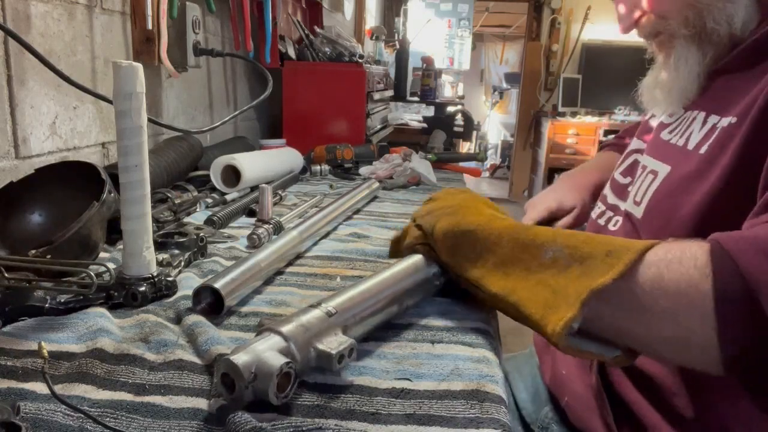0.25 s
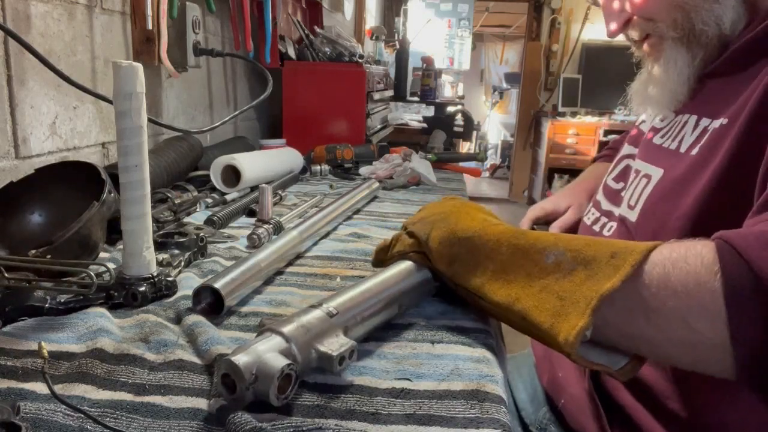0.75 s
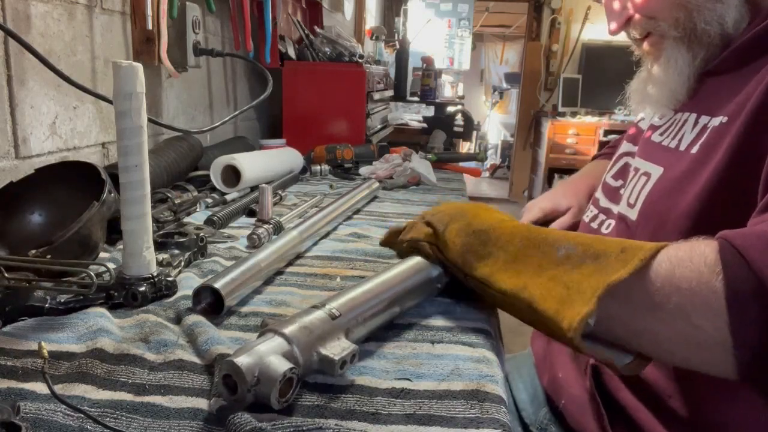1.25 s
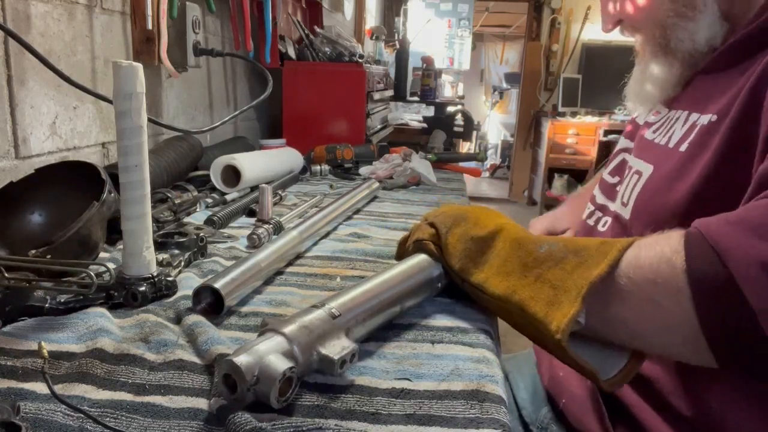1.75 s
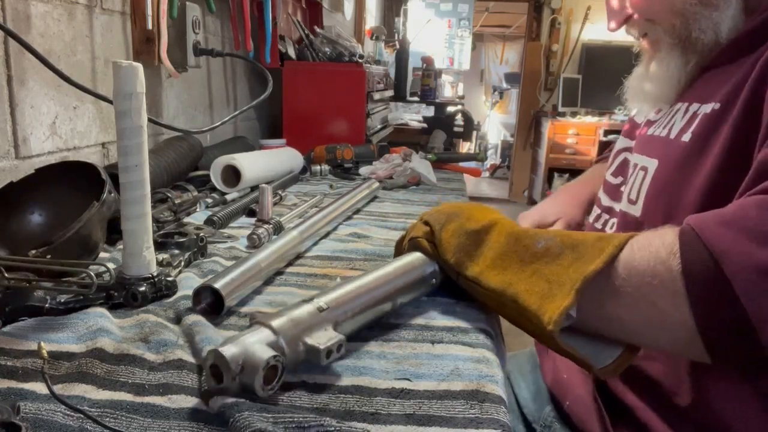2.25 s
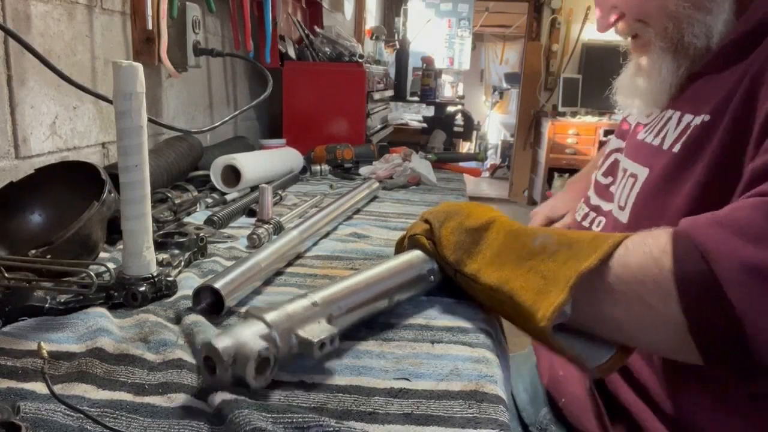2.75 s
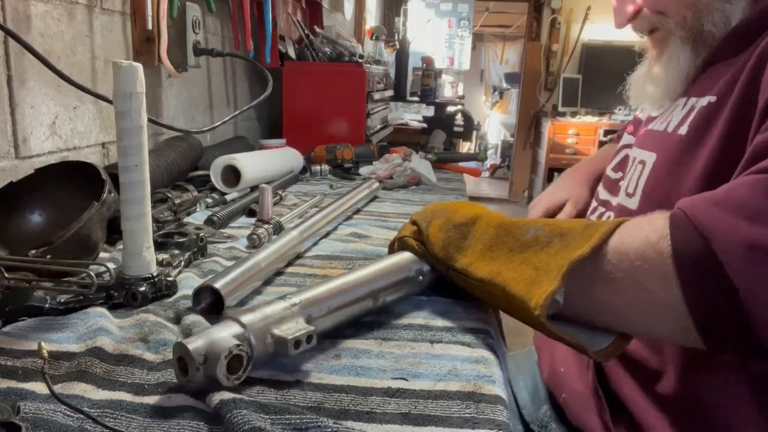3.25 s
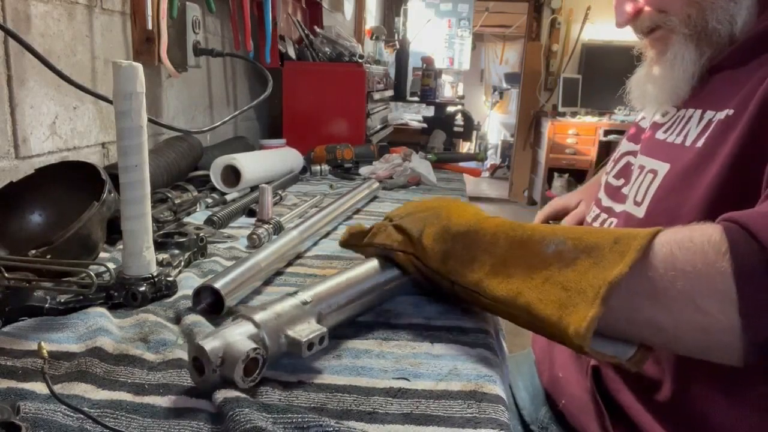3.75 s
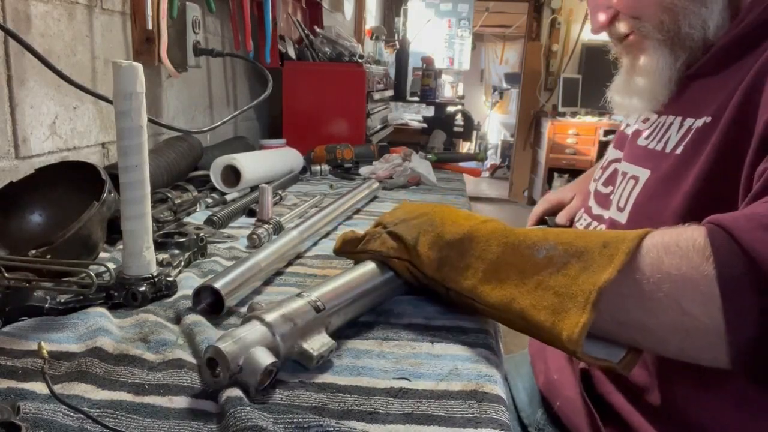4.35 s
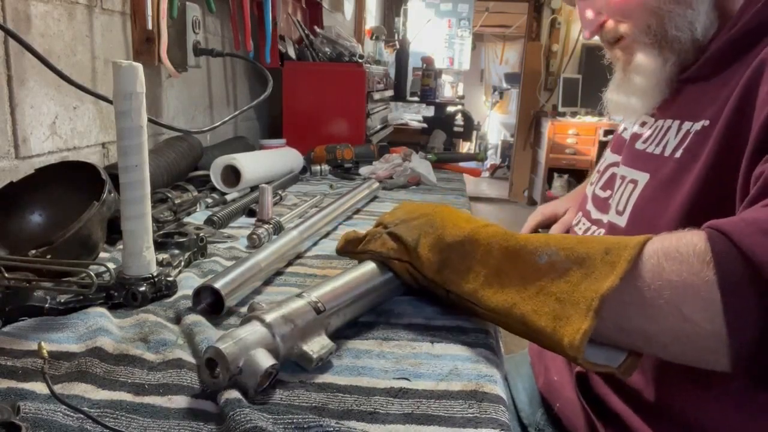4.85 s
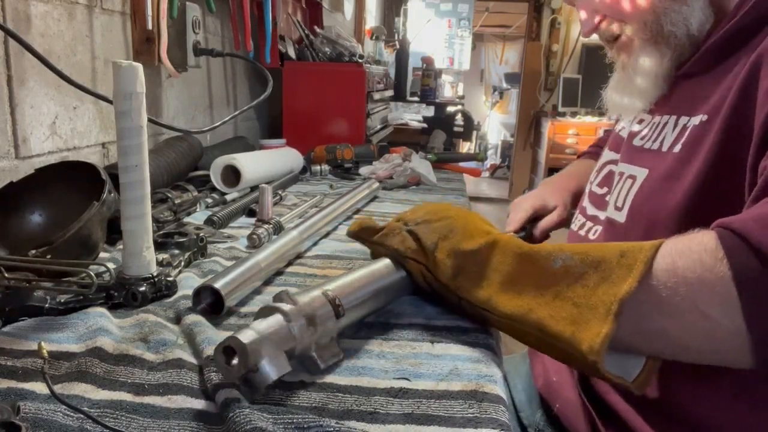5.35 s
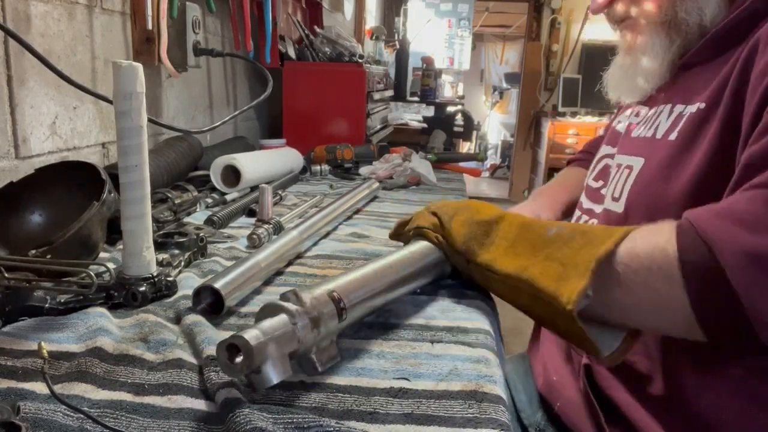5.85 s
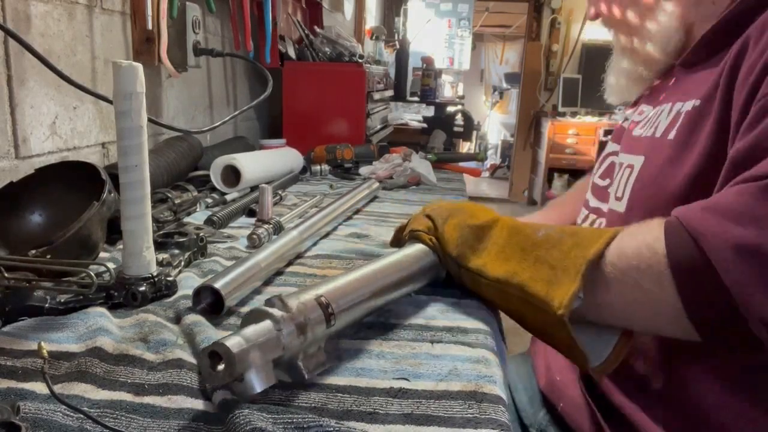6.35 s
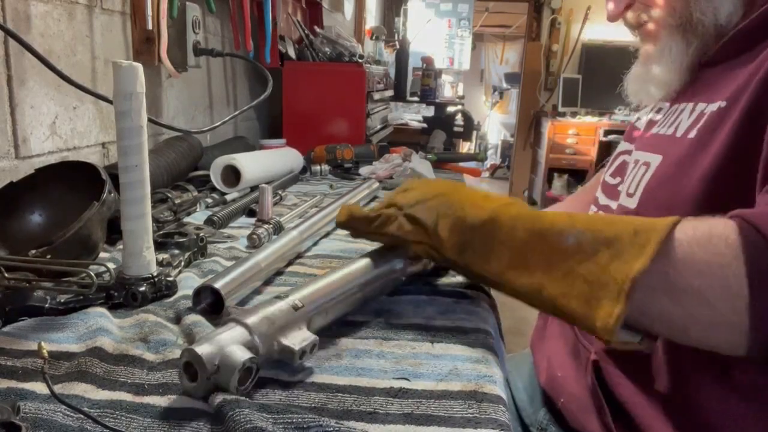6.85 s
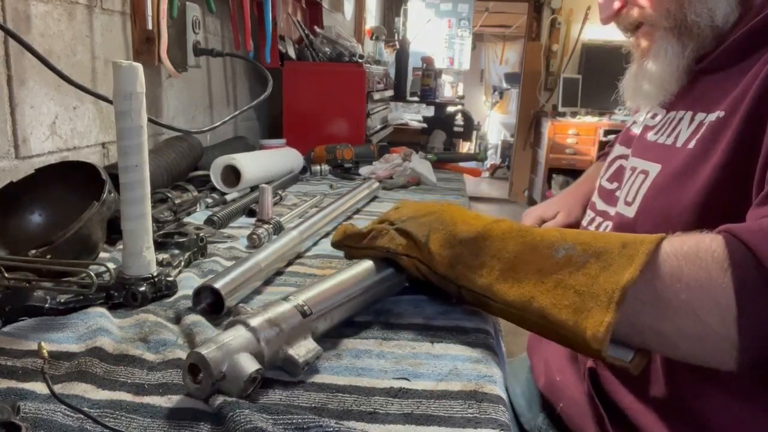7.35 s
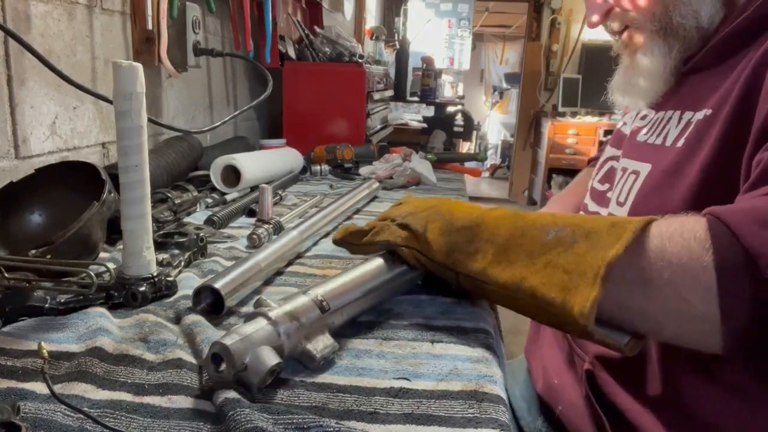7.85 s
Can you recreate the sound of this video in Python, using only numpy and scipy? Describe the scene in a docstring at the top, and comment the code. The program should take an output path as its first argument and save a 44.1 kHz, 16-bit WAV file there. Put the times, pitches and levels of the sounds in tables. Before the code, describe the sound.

Steel slides harshly inside a steel tube resting on a towel-covered bench. After a few clinks and bumps come five brisk back-and-forth rasps, bright and shimmering, the air inside rising in pitch on each push. A quiet stretch of small clicks leads to another single pump, then light catches, rubbing and rattling knocks. Close and dry-ish, with short room echoes and a steady low rumble.

```python
"""Slide-hammer strokes in a steel tube

A steel rod is pumped like a slide hammer inside a motorcycle fork tube on a towel-covered garage bench.
Friction slips drive resonances of steel, tube wall and enclosed air; stick-slip hoots; the steel shimmers on.
Knocks, catches and clinks of metal ring struck modes and resonances, and padded bumps ring the bench.
Two closely spaced microphone ports hear this with room echoes, over a low rumble with a trace of hiss."""
import sys
import numpy as np
from scipy import signal
from scipy.fft import rfft, irfft, next_fast_len
from scipy.io import wavfile

SR = 44100
rng = np.random.default_rng(int(sys.argv[2]) if len(sys.argv) > 2 else 0)


def digitize_waveform(pressure):
    """Quantize a signal to 16-bit integers and store it at the path in sys.argv[1].

    Rows of a 2-D input are taken as channels; values are limited to [-1, 1].
    """
    field = np.atleast_2d(pressure).T
    bounded = np.clip(field, -1, 1)
    quanta = np.round(bounded * 32767).astype(np.int16)
    wavfile.write(sys.argv[1], SR, quanta)


N = 356769
TIME = np.arange(N) / SR

# Pumps, a slow pull and a quick push: (pull start [s], push start [s], push end [s], end thump level [dB],
# then for the push: rasp [dB], hollow [dB], tube ring [dB])
PUMPS = [(1.511, 1.675, 1.782, -26, -15.5, -16, -19.5), (1.863, 1.994, 2.109, -30, -19.5, -21.5, -27.5),
         (2.168, 2.301, 2.398, -30.5, -15.5, -26, -31), (2.47, 2.637, 2.758, -36, -15, -22.5, -29.5),
         (2.832, 2.977, 3.072, -35.5, -13.5, -21, -28), (6.038, 6.265, 6.396, -35.5, -15.5, -17, -27.5)]
# Single slides of the rod, and one long faint slide of the weight along it:
# (start [s], length [s], rasp [dB], hollow [dB], tube ring [dB])
SLIDES = [(-.12, 0.24, -32, -48, -61.5), (1.356, 0.093, -28.5, -27.5, -28), (3.17, 0.25, -36.5, -60.5, -54),
          (5.043, 0.94, -69.5, -61, -72), (5.917, 0.1, -60, -43.5, -41)]
# Growth with mean stroke speed: (rasp exponent [1], hollow exponent [1], tube ring exponent [1])
SPEED_POWERS = (2.1, 1.2, 9.1)
PULL_PEAK_SHARE, PUSH_PEAK_SHARE = 0.4, 0.44   # fraction of the stroke's time at which the rod is fastest
PULL_SWELL = 0.77   # a pull is steadier: its friction follows speed to this power
REST_S, BREAKAWAY_DB = 1, -25   # tube ring level of a pull after this long without a pump
# Pitch of the air column with the rod drawn out, pushed home and in between
DRAWN_HZ, HOME_HZ, HALFWAY_HZ = 337, 790, 490
# Just before each push ends the rod bites and clacks on the bore, then drives the tube against the bench
STOP_CATCH_LEAD_S, STOP_CATCH_DB, STOP_CATCH_T60_S = 0.032, -11.5, 0.2
STOP_CLACK_DB, STOP_CLACK_T60_S = -41, 0.04
STOP_THUMP_LEAD_S, STOP_DEEP_DB, STOP_UPPER_DB = 0.011, -4, 5.5

# Resonances of the steel under the rasp: (frequency [Hz], width [Hz], level [dB])
STEEL = [(2226, 140, -10), (2875, 320, -1.5), (3400, 800, -1), (4045, 340, -0.5), (3820, 950, -7),
         (5310, 570, -6.5), (5975, 320, -7.5), (7296, 210, 4), (8900, 250, -0.5), (9990, 750, -7),
         (11490, 380, -8.5), (12400, 88, -4.5), (13900, 150, -6.5), (15280, 370, -15.5)]
# Narrow resonances picked out by the scraping contact: (frequency [Hz], width [Hz], level [dB])
CONTACT = [(3145, 90, -1), (4440, 170, -10.5), (5020, 82, -7), (6117, 100, -5), (7320, 39, 4)]
# Resonances of the air in the tube: (frequency [Hz], width [Hz], level [dB])
HOLLOW = [(273, 260, -1.5), (369, 48, 4), (476, 9.7, -3), (664, 72, 2), (730, 44, 1.5), (863, 38, -3),
          (1021, 96, 1.5), (1285, 250, -5.5), (1940, 210, -11.5)]
# Lower and upper resonance of the tube wall: (frequency [Hz], width [Hz], level [dB])
WALL = [(1605, 17, -3.5), (1755, 26, -6.5)]
# Stick-slip tones: (start [s], length [s], first pitch [Hz], last pitch [Hz], level [dB])
HOOTS = [(1.684, 0.036, 310, 593, -13), (1.882, 0.032, 816, 854, -10.5), (1.934, 0.049, 421, 353, -15.5),
         (2.068, 0.071, 687, 715, -22), (2.485, 0.015, 477, 730, -30.5), (2.585, 0.053, 407, 333, -21),
         (2.638, 0.053, 392, 476, -19), (2.71, 0.04, 580, 760, -18), (2.985, 0.029, 397, 680, -20.5),
         (3.016, 0.02, 480, 480, -20), (3.167, 0.038, 372, 312, -33.5), (6.104, 0.096, 376, 406, -20),
         (6.36, 0.025, 678, 782, -13.5)]

# Metal meets metal: (time [s], level [dB], ring pitch [Hz], ring t60 [s], clack re ring [dB],
# spray of slips re ring [dB])
KNOCKS = [(0.176, -34.5, 1760, 0.098, -16, 22.5), (0.754, -61, 1770, .05, 2, -14),
          (0.901, -55, 1704, 0.04, -1.5, -15), (1.1122, -26.5, 1764, 0.053, -9, 4),
          (1.294, -39, 1605, 0.039, -14, -31), (1.3806, -25, 1678, 0.1, -22, -3),
          (4.9161, -28.5, 1706, 0.027, -7.5, 14.5), (5.086, -56.5, 1634, 0.028, -8, 18),
          (5.141, -56.5, 1230, 0.015, -19, -31), (5.241, -45, 1405, 0.0072, -15, 9),
          (5.755, -57.5, 1490, 0.016, -1, -14), (5.965, -36.5, 1640, 0.061, -4, 17.5),
          (6.054, -30.5, 1500, 0.043, -1, -5), (6.929, -46, 1688, 0.25, -11, 19),
          (7.327, -58.5, 1680, .04, -7, 2), (7.411, -57.5, 1656, 0.081, -11, -11),
          (7.438, -56, 1640, 0.044, -16, 32), (7.49, -53, 1690, 0.04, -6, -3),
          (7.514, -42, 1686, 0.094, -9, 19), (7.576, -29, 1683, 0.13, -35, 10),
          (7.622, -36.5, 1644, 0.048, -5.5, 27), (7.6854, -24.5, 1690, 0.03, -13.5, 10.5)]
# Resonances of a knock's clack: (frequency [Hz], width [Hz], level [dB])
CLACK = [(734, 53, 5.5), (1007, 230, 7), (1303, 15, 1.5), (1610, 320, -3), (1670, 82, -3), (2726, 700, -6)]
UPPER_MODE_DB, SPRAY_T60_S = -12, 0.051   # upper modes re ring in the hardest knock; decay of a knock's slips
# Short catches of the rod in the bore: (time [s], level [dB], t60 [s])
TICKS = [(0.173, -10.5, 0.03), (0.495, -25, 0.073), (0.6446, -22.5, 0.07), (0.7507, -34.5, 0.066),
         (1.1924, -28, 0.14), (1.877, -14.5, 0.06), (2.372, -11, 0.05), (3.5504, -11.5, 0.035),
         (3.6108, -19, 0.023), (4.631, -38, 0.047), (4.8725, -15, 0.096), (5.9635, -18.5, 0.096),
         (6.052, -7.5, 0.021), (6.6916, -14, 0.097), (6.772, -14.5, 0.04), (6.8505, -12.5, 0.038),
         (7.1595, -29.5, 0.047), (7.241, -34.5, 0.087), (7.488, -20, 0.11), (7.853, -35.5, 0.058)]
# Resonances of the rod, sounded by catches and firm rubbing: (frequency [Hz], width [Hz], level [dB])
ROD = [(3090, 130, -3.5), (3698, 32, 4), (4370, 39, -13.5), (5050, 17, -13), (6110, 45, -14),
       (7380, 110, -11.5)]
# Rod buzz after a catch of 0 dB, dB lost per dB of lighter catch, and decay time
RING_DB, RING_FOLLOWS, RING_T60_S = -33, 0.64, 0.15
# Clinks of metal, in hard knocks and in rattling: (time [s], level [dB], pitch most strongly struck [Hz])
CLINKS = [(0.179, -29.5, 3530), (4.874, -31, 3290), (4.917, -31, 3730), (7.159, -46.5, 3210),
          (7.436, -37.5, 3000), (7.439, -40, 990), (7.488, -35, 4900), (7.491, -41, 750),
          (7.514, -38.5, 1300), (7.537, -44, 4900), (7.576, -40.5, 4900), (7.625, -31.5, 3580)]
# Modes rung by the clinks: (frequency [Hz], level [dB], t60 [s])
CLINK_MODES = [(740, 6, 0.14), (1204, 3.5, 0.18), (2833, 2, 0.058), (3206, 9.5, 0.05), (3790, -27, 0.049),
               (4880, -6.5, .07)]
# Rubs as gloved hand and rod shift: (start [s], length [s], pressure [dB], dull scuffing re pressure [dB])
RUBS = [(-.03, 0.17, -34, -13.5), (0.469, 0.28, -58, -2), (3.15, 0.089, -37, -18.5),
        (3.29, 0.028, -32.5, -14.5), (3.481, 0.065, -44.5, -12.5), (3.949, 0.077, -67.5, 11),
        (4.615, 0.0081, -53, 5.5), (5.08, 0.017, -56.5, 2), (5.209, 0.013, -49.5, -11),
        (5.565, 0.017, -56.5, 10), (5.744, 0.028, -59.5, 9.5), (6.523, 0.4, -44, -11),
        (7.398, 0.44, -46.5, 0), (7.812, 0.56, -56, -2.5)]
RUB_ATTACK_S, RUB_RELEASE_S = 0.013, 0.062

# Bumps of the tube on the bench through the towel: (time [s], level [dB], deep boom re level [dB])
THUMPS = [(0.049, -39, -9.5), (0.179, -25.5, -34.5), (0.759, -42.5, -10), (0.905, -38.5, -11.5),
          (1.113, -40.5, -8.5), (1.299, -39.5, -12.5), (1.404, -35, -3), (2.051, -27.5, -15),
          (2.155, -19.5, -28.5), (2.466, -29, -17.5), (3.361, -40, -10.5), (4.005, -42, -4.5),
          (4.641, -46.5, -17), (4.854, -45, -18), (5.136, -50.5, -17), (5.773, -47, -1.5),
          (6.067, -31.5, -14), (6.301, -29.5, -29.5), (7.419, -42, -6.5), (7.640, -20.5, -12.5),
          (7.683, -29.5, -6)]
# Modes of the bench under the tube: (frequency [Hz], level [dB], t60 [s])
BENCH = [(60.55, -4, 0.45), (79.64, 2.5, 0.27), (100.7, -15.5, 0.2), (129.2, -11, 0.089),
         (169.1, 1.5, 0.14), (202.2, -7.5, 0.16), (246.4, -4.5, 0.067), (283, -5, 0.08), (348, 1.5, 0.048),
         (394.2, -1, 0.072), (500.4, -5, 0.077), (687, -11.5, 0.13)]
HARD_THUMP_UPPER_DB, UPPER_FALL = -0.5, 0.45   # upper modes in the hardest bump; dB lost per dB of gentler bump

# Further phase by which the left port trails the right: (frequency [Hz], phase [rad])
PORT_PHASE = [(200, .1), (600, .25), (1000, 2.1), (1200, 4.4), (2000, 4.7), (4000, 6.0), (5000, 6.28)]
PORT_LAG_S = .000185   # the left port hears the direct sound this much later than the right
# Room decay: (frequency [Hz], t60 [s], reverberation re direct sound [dB])
GARAGE = [(58.15, 0.81, -7), (169, 0.55, -4.5), (395, 0.69, -3.5), (785, .36, -6), (1572, 0.47, -2),
          (3860, 0.39, -1), (6800, 0.1, -5.5), (9200, 0.28, -8.5), (16000, 0.13, -12)]
# Relative spectrum of the background: (frequency [Hz], density [dB per Hz])
BACKGROUND = [(15, -64), (25, -29), (37, -19.5), (60, -7), (73, -8), (81, -17.5), (139, -25), (158, -23),
              (257, -49), (691, -45.5), (1350, -51), (1960, -60), (10900, -71), (15000, -76.5)]
BACKGROUND_DB = -52.5
CUTOFF_HZ = 15900


def from_db(db):
    """Logarithmic level: 20 dB is a factor of ten in amplitude."""
    return 10 ** (np.asarray(db) / 20)


def rms_one(x):
    """Normalization: scale to unit mean power."""
    return x / np.sqrt(np.mean(x ** 2) + 1e-20)


def at_hz(table, hz, axis=1):
    """Interpolation: read a table column on a log-frequency axis."""
    table = np.array(table)
    return np.interp(np.log(np.maximum(hz, 1)), np.log(table[:, 0]), table[:, axis])


def add(track, s, sound):
    """Superposition: mix a sound into a track from time s on."""
    start = max(round(s * SR), 0)
    track[start:start + len(sound)] += sound[:N - start]


def low_pass(x, order, hz):
    """Low-pass filtering: attenuate what lies above a corner frequency."""
    return signal.sosfilt(signal.butter(order, hz, fs=SR, output="sos"), x)


def drift(hz):
    """Random fluctuation: low-passed noise of unit power."""
    return rms_one(low_pass(rng.standard_normal(N), 2, hz))


def chatter(hz, depth_db):
    """Amplitude modulation: contact pressure varies at random, as a gain of unit power."""
    return rms_one(from_db(depth_db * drift(hz)))


def slips(per_s, spread_db):
    """Dry friction: tiny catches of uneven size at random moments, of unit power."""
    sizes = from_db(spread_db * np.minimum(rng.exponential(1, N), 4))
    return rms_one(sizes * rng.choice([-1, 1], N) * (rng.random(N) < per_s / SR))


def mode(t, hz, t60):
    """Free damped vibration: a sine that falls by 60 dB in t60."""
    return np.sin(2 * np.pi * hz * t) * from_db(-60 * t / t60)


def resonate(drive, resonances):
    """Forced resonance: parallel resonators of alternating sign; white noise keeps its power."""
    out, power = 0, 0
    for k, (hz, width, db) in enumerate(resonances):
        radius = np.exp(-np.pi * width / SR)
        top = (1 - radius * radius) / 2
        poles = [1, -2 * radius * np.cos(2 * np.pi * hz / SR), radius * radius]
        response = signal.lfilter([top, 0, -top], poles, drive + 1e-18)
        out = out + (-1) ** k * from_db(db) * response
        power += top * from_db(db) ** 2
    return out / np.sqrt(power)


def glide(drive, hz, width_hz):
    """Time-varying resonance: its pitch moves while white noise keeps its power."""
    turn = np.exp(2j * np.pi * np.cumsum(hz) / SR)
    radius = np.exp(-np.pi * width_hz / SR)
    response = turn * signal.lfilter([1], [1, -radius], drive / turn + 1e-18)
    return np.sqrt(2 * (1 - radius * radius)) * np.real(response)


def strokes():
    """Sliding friction: force swells with sliding speed and drives the steel, the hollow and the tube wall."""
    force = np.zeros((3, N))
    for start, rise, fall, levels_db, arrival in movements():
        phase = np.interp(TIME, np.cumsum([start, rise, fall]), [0, np.pi / 2, np.pi])
        speed = np.abs(np.sin(phase))
        pulling = arrival == DRAWN_HZ
        force += from_db(levels_db)[:, None] * speed ** (PULL_SWELL if pulling else 1)
    rasp, hollow, wall = force
    # the contact point wanders, so the resonances swell in separate groups
    steel, body = 0, 0
    for k in range(2):
        steel_drive = rasp * chatter(hz=33.8, depth_db=3.0) * slips(per_s=3000, spread_db=3.0)
        steel = steel + resonate(steel_drive, STEEL[k::2])
        body_drive = hollow * chatter(hz=29.4, depth_db=4.0) * slips(per_s=600, spread_db=3.0)
        body = body + resonate(body_drive, HOLLOW[k::2])
    column = air_column(hollow * slips(per_s=2300, spread_db=0.5))
    return (from_db(-7.0) * steel + from_db(-17) * grating(rasp) + from_db(-4.0) * body
            + from_db(-7.5) * column + tube_wall(wall))


def movements():
    """Kinematics: slides and strokes in order, as (start, speeding up, slowing down, levels, final pitch)."""
    moves = [(s, length / 2, length / 2, np.array(levels_db), HALFWAY_HZ) for s, length, *levels_db in SLIDES]
    last_end = -np.inf
    for pull, push, end, _, *levels_db in PUMPS:
        pull_s, push_s = push - pull, end - push
        # a pull covers the same way as its push, but slower
        pull_db = levels_db + np.array(SPEED_POWERS) * 20 * np.log10(push_s / pull_s)
        if pull - last_end > REST_S:
            pull_db[-1] = BREAKAWAY_DB
        moves += [(pull, pull_s * PULL_PEAK_SHARE, pull_s * (1 - PULL_PEAK_SHARE), pull_db, DRAWN_HZ),
                  (push, push_s * PUSH_PEAK_SHARE, push_s * (1 - PUSH_PEAK_SHARE), np.array(levels_db), HOME_HZ)]
        last_end = end
    return sorted(moves, key=lambda move: move[0])


def grating(force, wander=0.0098):
    """Coarse friction: slips excite narrow resonances that flare and shift as the contact moves."""
    drive = force * slips(per_s=680, spread_db=-1.5)
    out = 0
    for hz, width, db in CONTACT:
        flare = chatter(hz=22, depth_db=8.0)
        moving_hz = hz * (1 + wander * drift(hz=9))
        out = out + from_db(db) * flare * glide(drive, moving_hz, width)
    return out


def air_column(drive):
    """Closed-pipe resonance: pushing shortens the column and raises it, pulling lowers it; third multiple added."""
    log_hz, pitch = np.log(HALFWAY_HZ), HALFWAY_HZ
    for start, rise, fall, _, arrival in movements():
        travelled = (1 - np.cos(np.interp(TIME, [start, start + rise + fall], [0, np.pi]))) / 2
        log_hz = log_hz + travelled * np.log(arrival / pitch)
        pitch = arrival
    hz = np.exp(log_hz)
    return glide(drive, hz, width_hz=74) + from_db(-20.5) * glide(drive, 3 * hz, width_hz=250)


def tube_wall(drive, other_mode_db=-6, wander=0.024):
    """Selective excitation: pushing favours the upper wall resonance, otherwise the lower; each flickers alone."""
    pushing = sum((TIME > push) & (TIME < end) for _, push, end, *_ in PUMPS)
    out = 0
    for (hz, width, db), idle in zip(WALL, (pushing, 1 - pushing)):
        wall_drive = drive * chatter(hz=37.47, depth_db=6.0) * slips(per_s=2200, spread_db=2.5)
        moving_hz = hz * (1 + wander * drift(hz=16))
        out = out + from_db(db + other_mode_db * idle) * glide(wall_drive, moving_hz, width)
    return out


def hoots(waver=0.013):
    """Stick-slip oscillation: short, rough, gliding tones that swell and fade."""
    out = np.zeros(N)
    unsteady = chatter(hz=150, depth_db=16.0) ** waver
    unsteady /= unsteady.mean()
    for s, length, first_hz, last_hz, db in HOOTS:
        progress = np.linspace(0, 1, int(length * SR))
        hz = (first_hz + (last_hz - first_hz) * progress) * unsteady[int(s * SR):][:len(progress)]
        tone = np.sin(2 * np.pi * np.cumsum(hz) / SR)
        add(out, s, from_db(db) * np.sin(np.pi * progress) ** 2 * tone)
    return out * chatter(hz=120, depth_db=4.5)


def knocks(upper_t60=0.044, clack_t60=0.035, choke_db=5, contact_hz=4500):
    """Impact of metal on metal: a pair of wall modes, more upper modes when hard; clack chokes the ring."""
    ring, force, t = np.zeros(N), np.zeros(N), TIME[:SR // 3]
    upper = mode(t, 4377, upper_t60) + from_db(-12) * mode(t, 5060, upper_t60)
    hardest_db = max(row[1] for row in KNOCKS)
    for s, db, hz, ring_t60, clack_db, _ in KNOCKS:
        pair = mode(t, hz, ring_t60) + from_db(-16.5) * mode(t, hz * 1.2, clack_t60)
        freedom = 1 / np.hypot(1, from_db(clack_db + choke_db))
        add(ring, s, freedom * from_db(db) * (pair + from_db(UPPER_MODE_DB + db - hardest_db) * upper))
        add(force, s, from_db(db + clack_db - 60 * t / clack_t60))
    for _, _, end, *_ in PUMPS:
        add(force, end - STOP_CATCH_LEAD_S, from_db(STOP_CLACK_DB - 60 * t / STOP_CLACK_T60_S))
    drive = low_pass(force * slips(per_s=4000, spread_db=3.0), 2, contact_hz)
    return from_db(12.5) * ring + from_db(15.5) * resonate(drive, CLACK)


def catches():
    """Momentary seizure: the rod catches alone, in knocks and at push ends, as (time, level, t60)."""
    in_knocks = [(s, db + spray_db, SPRAY_T60_S) for s, db, *_, spray_db in KNOCKS]
    at_stops = [(end - STOP_CATCH_LEAD_S, STOP_CATCH_DB, STOP_CATCH_T60_S) for _, _, end, *_ in PUMPS]
    return TICKS + in_knocks + at_stops


def ticks(rise_s=0.0018, light_touch_hz=6000, firm_low_hz=3000, firm_db=-10):
    """Transient friction: sprays of slips leave the rod buzzing; light touches are dull, firm ones bright."""
    force, firm, ring, t = np.zeros(N), np.zeros(N), np.zeros(N), TIME[:SR // 3]
    onset = 1 - np.exp(-t / rise_s)
    for s, db, t60 in catches():
        burst = from_db(db - 60 * t / max(t60, .01)) * onset
        add(force, s, burst)
        add(firm, s, burst * min(from_db((db - firm_db) / 2), 1))
        add(ring, s, from_db(RING_DB + RING_FOLLOWS * db - 60 * t / RING_T60_S) * onset)
    grains = slips(per_s=6700, spread_db=-0.5) * chatter(hz=111.5, depth_db=5.0)
    bright = signal.sosfilt(signal.butter(1, firm_low_hz, "high", fs=SR, output="sos"), firm * grains)
    drive = bright + low_pass((force - firm) * grains, 2, light_touch_hz)
    return from_db(-3.5) * resonate(drive, STEEL) + resonate(ring * grains, ROD) + from_db(-8.5) * resonate(drive, HOLLOW)


def clinks(fall_db_per_octave=13):
    """Modal excitation: each clink favours the modes nearest to one pitch."""
    out, t = np.zeros(N), TIME[:SR // 3]
    for s, db, struck_hz in CLINKS:
        for hz, mode_db, t60 in CLINK_MODES:
            distance_octaves = abs(np.log2(hz / struck_hz))
            add(out, s, from_db(db + mode_db - fall_db_per_octave * distance_octaves) * mode(t, hz, t60))
    return out


def shifting(grip_db=-36, glove_hz=1400):
    """Pressure-dependent friction: light rubs sound faintly and scuff dully; firm ones make the rod sing."""
    pressure, scuffing = np.zeros((2, N))
    for s, length, db, dull_db in RUBS:
        corners = [s, s + min(RUB_ATTACK_S, length), s + length, s + length + RUB_RELEASE_S]
        spell = from_db(db) * np.interp(TIME, corners, [0, 1, 1, 0])
        pressure += spell
        scuffing += spell * from_db(dull_db)
    grains = slips(per_s=3300, spread_db=2.0) * chatter(hz=28.7, depth_db=4.0)
    drive = pressure * grains
    squeak = resonate(drive * np.minimum(pressure / from_db(grip_db), 1), ROD)
    scuff = resonate(low_pass(scuffing * grains, 2, glove_hz), CLACK)
    return (from_db(-13.0) * resonate(drive, STEEL) + from_db(-9.5) * resonate(drive, HOLLOW)
            + scuff + from_db(-4.5) * squeak)


def afterring(x, low_hz=2800, high_hz=11000, t60=0.34, early_t60=0.027, early_db=6, ring_db=-6.0):
    """High modal density: a decaying noise response lets the steel shimmer after every contact."""
    t = TIME[:SR // 2]
    fade = from_db(-60 * t / t60) + from_db(early_db - 60 * t / early_t60)
    tail = rng.standard_normal(len(t)) * fade / np.sqrt(np.sum(fade ** 2))
    tail = signal.sosfilt(signal.butter(2, [low_hz, high_hz], "band", fs=SR, output="sos"), tail)
    return x + from_db(ring_db) * signal.fftconvolve(x, tail)[:N]


def bumps(hardest_db):
    """Impact strength: loose bumps and push ends, as (time, level, deep boom level, upper mode level)."""
    loose = [(s, db, deep_db, HARD_THUMP_UPPER_DB - UPPER_FALL * (hardest_db - db)) for s, db, deep_db in THUMPS]
    at_stops = [(end - STOP_THUMP_LEAD_S, db, STOP_DEEP_DB, STOP_UPPER_DB) for _, _, end, db, *_ in PUMPS]
    return loose + at_stops


def thumps(contact_hz=900, press_s=0.00051):
    """Padded impact: gentle blows sink slowly into the towel; hard loose ones rouse more upper bench modes."""
    out, t = np.zeros(N), TIME[:SR // 2]
    luck = rng.standard_normal((len(THUMPS) + len(PUMPS), len(BENCH)))
    hardest_db = max(row[1] for row in THUMPS)
    for (s, db, deep_db, upper_db), chances in zip(bumps(hardest_db), luck):
        colour = [(80, deep_db), (135, 0), (230, 0), (320, upper_db)]   # (frequency [Hz], level [dB])
        onset = 1 - np.exp(-t / (press_s * from_db((hardest_db - db) / 2)))
        for k, (hz, mode_db, t60) in enumerate(BENCH):
            level_db = db + mode_db + at_hz(colour, hz) + 2 * chances[k]
            add(out, s, onset * (-1) ** k * from_db(level_db) * mode(t, hz, t60))
    return from_db(8.5) * low_pass(out, 2, contact_hz)


def ports(x):
    """Propagation delay: the direct sound reaches the left port a little later than the right."""
    size = next_fast_len(N + SR)
    hz = np.fft.rfftfreq(size, 1 / SR)
    phase_lag = 2 * np.pi * hz * PORT_LAG_S + at_hz(PORT_PHASE, hz)
    left = irfft(rfft(x, size) * np.exp(-1j * phase_lag), size)[:N]
    return np.array([left, x])


def garage(x, early_t60=0.1, early_db=7, gap_s=0.0016):
    """Reverberation: clutter on the bench scatters early echoes, then the tail dies band by band."""
    t, edges = TIME[:int(.8 * SR)], np.geomspace(40, 18000, 15)
    white, echoes = rng.standard_normal((2, 2, len(t))), 0
    for k, (low, high) in enumerate(zip(edges, edges[1:])):
        hz = np.sqrt(low * high)
        late, early = from_db(-60 * t / at_hz(GARAGE, hz)), from_db(early_db - 60 * t / early_t60)
        fade = (late + early) * (t > gap_s)
        burst = white[k % 2] * fade / np.sqrt(np.sum(fade ** 2))
        band = signal.sosfilt(signal.butter(2, [low, high], "band", fs=SR, output="sos"), burst)
        echoes = echoes + from_db(at_hz(GARAGE, hz, axis=2)) * band
    return signal.fftconvolve(x[None], echoes, axes=1)[:, :N]


def background():
    """Stationary noise: a steady low rumble, largely alike at both ports, with a trace of hiss."""
    hz = np.fft.rfftfreq(N, 1 / SR)
    spectra = rfft(rng.standard_normal((2, N))) * from_db(at_hz(BACKGROUND, hz))
    mid, side = rms_one(irfft(spectra, N))
    stereo = mid + from_db(-11.5) * side * np.array([[1], [-1]])
    return from_db(BACKGROUND_DB) * stereo * from_db([[1.5], [-1.5]])


def scene():
    """Superposition: the tube lies near the middle, the bench booms from the left, over the background."""
    metal = afterring(strokes() + hoots() + shifting() + ticks() + knocks() + clinks())
    bench = thumps()
    tube_sound = from_db(1.5) * (ports(metal) + garage(metal)) * from_db([[-.2], [.2]])
    bench_sound = (ports(bench) + garage(bench)) * from_db([[2.5], [-3.5]])
    return tube_sound + bench_sound + background()


def record(dry, top=0.94):
    """Saturation and band limiting: the highest peaks are rounded and the top of the spectrum cut steeply."""
    rounded = top * np.tanh(dry / top)
    return signal.sosfilt(signal.ellip(10, .1, 80, CUTOFF_HZ, fs=SR, output="sos"), rounded)


dry = scene()
out = record(dry)
digitize_waveform(out)
```